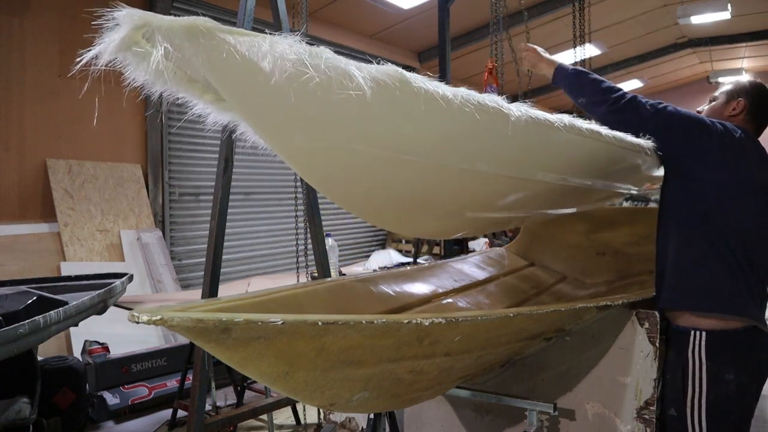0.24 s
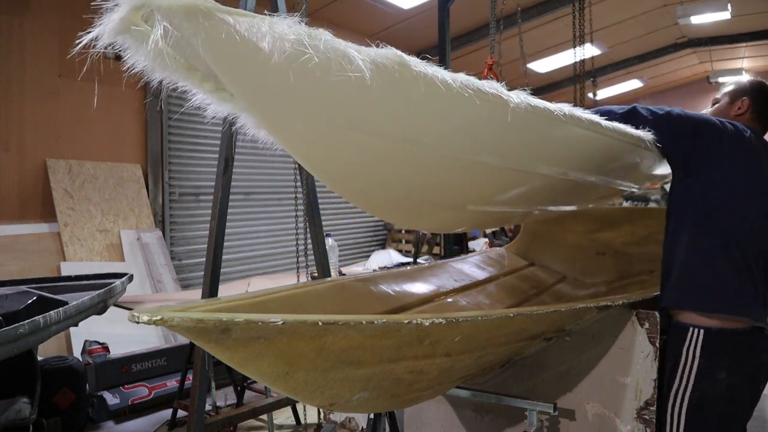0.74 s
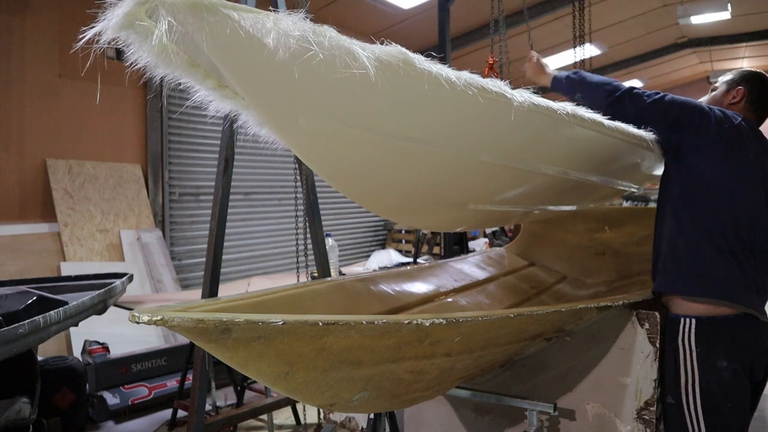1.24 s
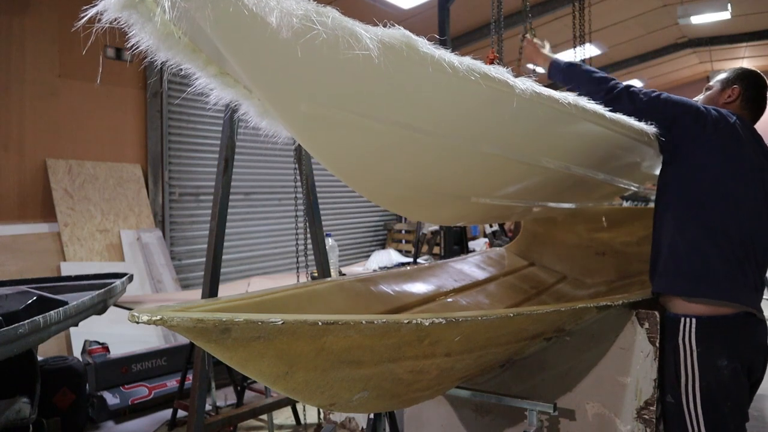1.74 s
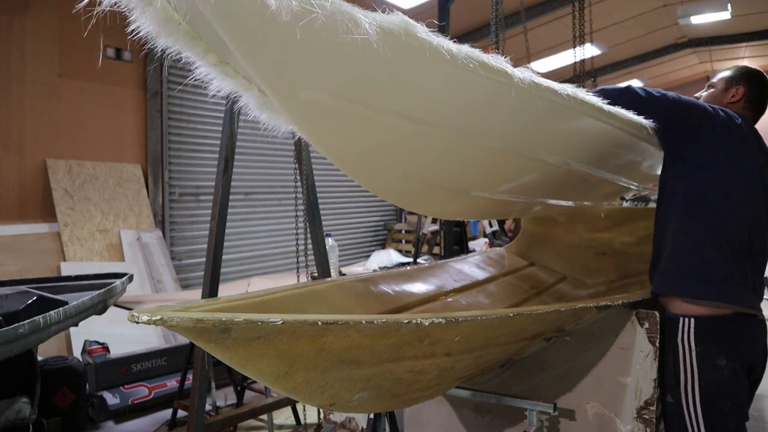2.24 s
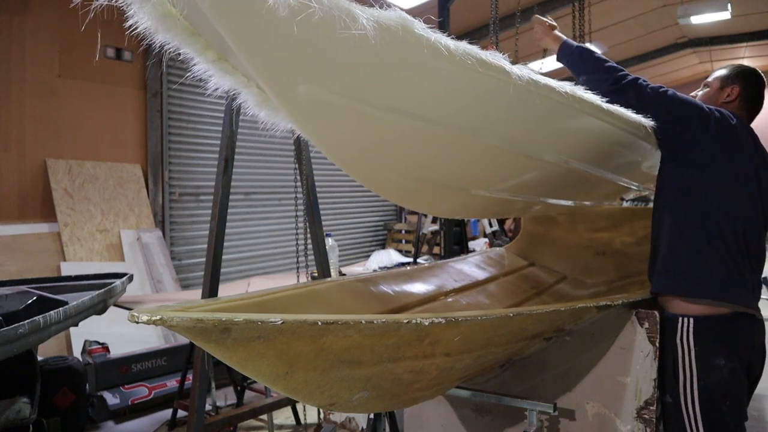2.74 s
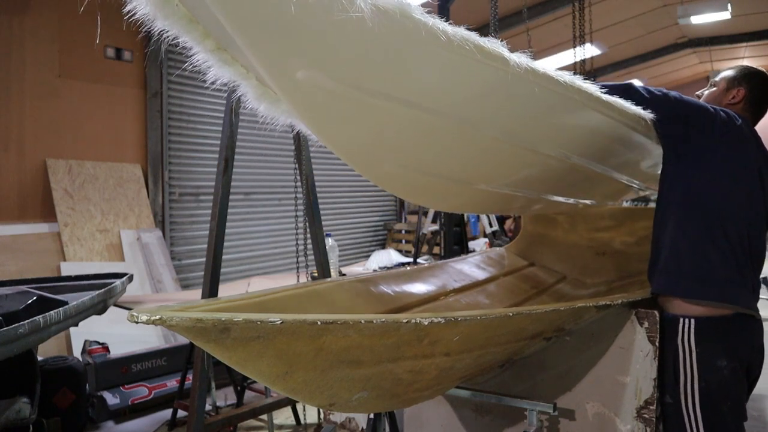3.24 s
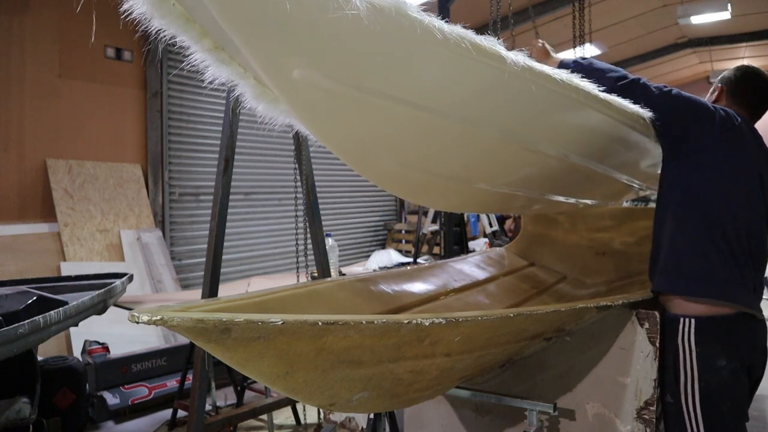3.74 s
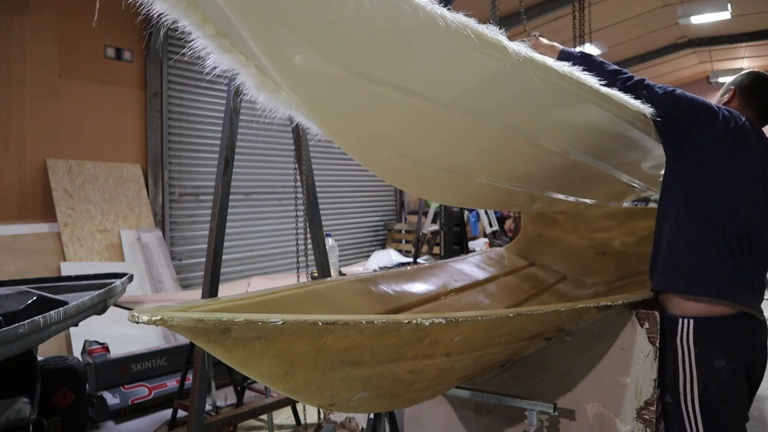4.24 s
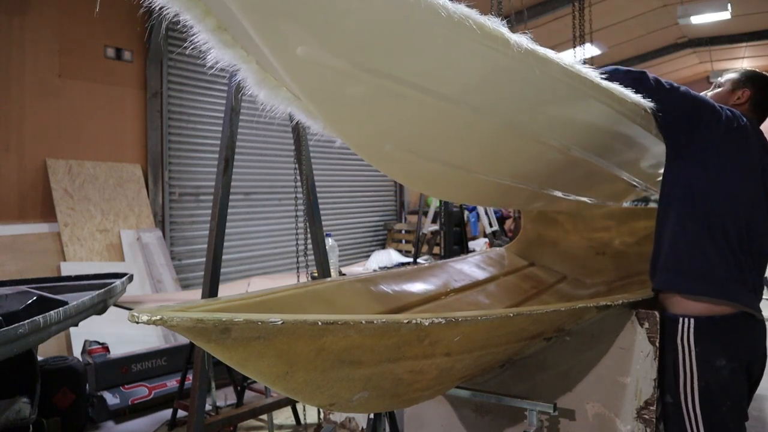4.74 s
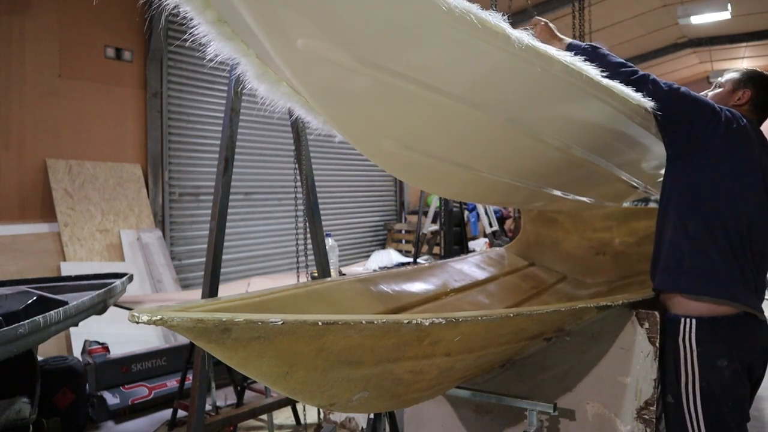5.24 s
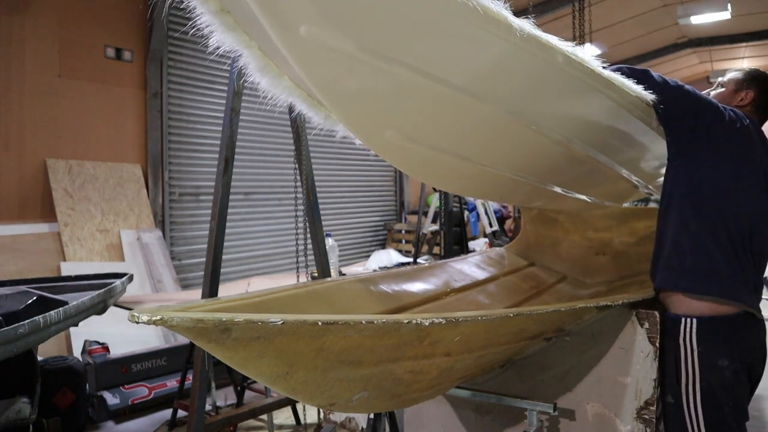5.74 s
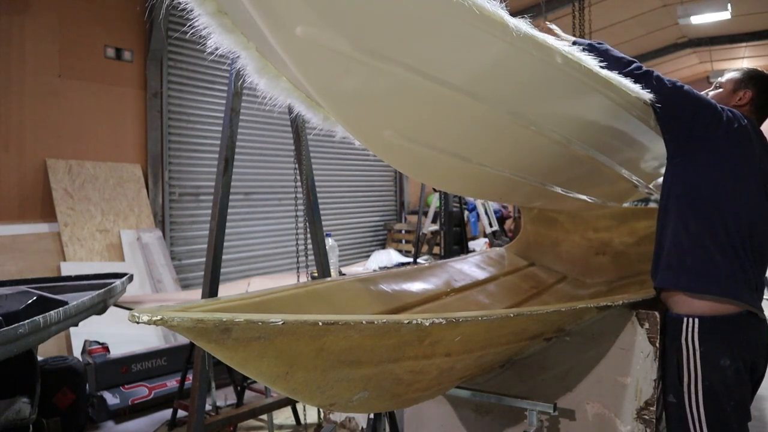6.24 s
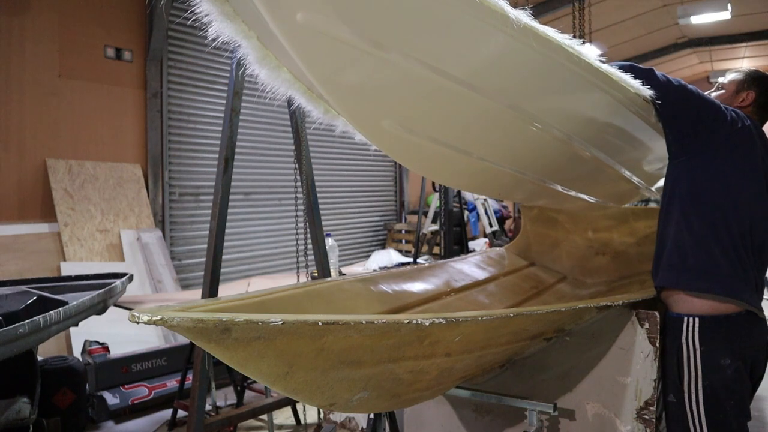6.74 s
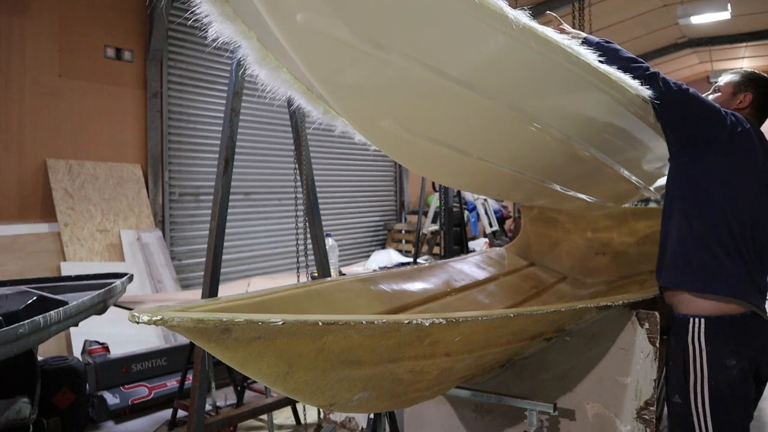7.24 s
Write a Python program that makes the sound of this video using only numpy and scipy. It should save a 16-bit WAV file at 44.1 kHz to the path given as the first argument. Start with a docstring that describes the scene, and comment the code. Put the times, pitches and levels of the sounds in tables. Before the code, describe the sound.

A chain is already rattling at the start, then comes eight more short pulls. Light link clinks lead each one, followed by a coarse, rapid metallic rasp and bouncing knocks on a hollow hull that booms faintly underneath. Echoes fill the gaps, along with occasional brief scrapes of swinging chain. Near stereo microphones in a large hard hall, quiet steady air behind.

```python
"""A hand chain hoist lifts a boat moulding in a large workshop; the first pull is already under way.
In each later pull the steel links jingle first, as shaped noise ticks and decaying tones.
Then the taut chain rasps and knocks on a stiff panel, whose bending waves make each knock a tiny falling chirp.
Between some pulls the slack chain swings back and brushes the panel.
The hall rings on for about a second, the shell booms faintly, and soft noise is the still air throughout."""
import sys
import numpy as np
from scipy import signal
from scipy.fft import rfft, irfft, next_fast_len
from scipy.io import wavfile

SR = 44100
rng = np.random.default_rng(int(sys.argv[2]) if len(sys.argv) > 2 else 0)


def unload_wav(signal):
    """Save mono or channel-first audio to the path in sys.argv[1] as 16-bit WAV at rate SR, clipped to [-1, 1]."""
    wavfile.write(
        sys.argv[1],
        SR,
        np.round(np.clip(np.atleast_2d(signal).T, -1, 1) * 32767).astype(np.int16),
    )


N = 330309

# samples in one knock or clink, and samples that come before its strike
SIZE, LEAD = 2048, 256


def amp(db):
    """Turns decibels into a plain factor."""
    return 10 ** (np.asarray(db) / 20)


def unit(x):
    """Scales a short sound to an average energy of 1 per channel."""
    return x / np.sqrt(np.sum(x ** 2) / len(x) + 1e-20)


def evened(x):
    """Scales to rms 1."""
    return x / np.sqrt(np.mean(x ** 2) + 1e-20)


def read(points, hz):
    """Reads a table between its points, on a log-frequency axis."""
    f, value = np.transpose(points)
    return np.interp(np.log(hz + 1), np.log(f + 1), value)


def colour(x, points):
    """Filters a sound by the frequency curve of a table in dB."""
    size = next_fast_len(x.shape[-1])
    gain = amp(read(points, np.fft.rfftfreq(size, 1 / SR)))
    return irfft(rfft(x, size) * gain, size)[..., :x.shape[-1]]


def add(mix, s, sound):
    """Mixes in a short stereo sound whose strike lies LEAD samples after its start."""
    at = round(s * SR) - LEAD
    sound = sound[:, max(-at, 0):]  # cut what falls before the beginning
    part = mix[:, max(at, 0):][:, :sound.shape[1]]
    part += sound[:, :part.shape[1]]


def shower(sounds, strength, per_s, spread_db):
    """Links pass in quick, uneven succession, each making one of the sounds."""
    count = 5000
    gap, size, pick = rng.random((count, 3)).T
    times = np.cumsum(.15 + 1.7 * gap) / per_s
    gains = evened(amp(spread_db * (2 * size - 1))) * np.sqrt(SR / per_s)
    gains = gains * np.interp(times, np.arange(N) / SR, strength * np.ones(N))
    picks = (pick * len(sounds)).astype(int)
    out = np.zeros((2, N))
    for s, gain, k in zip(times[times < N / SR], gains, picks):
        add(out, s, gain * sounds[k])
    return out


# Pulls on the hand chain. Each row: grabbed, taut and let go in seconds,
# then rasp and jingle strength in dB before the mix levels.
PULLS = [(-.3, -.2, 0.073, -22.5, -24), (0.523, .745, 0.81, -24.5, -27), (1.282, 1.386, 1.585, -26, -24.5),
         (2.086, 2.175, 2.432, -24, -24), (3.049, 3.167, 3.35, -22.5, -26), (3.817, 3.951, 4.085, -24, -25),
         (4.649, 4.797, 4.945, -24.5, -26.5), (5.498, 5.603, 5.79, -24, -28),
         (6.427, 6.516, 6.7, -26.5, -30.5)]
# The slack chain swings back and brushes the panel. Each row: middle in seconds, half length in seconds,
# peak rasp strength in dB before the mix level.
SWINGS = [(0.142, 0.037, -27), (1.015, 0.017, -26.5), (4.301, 0.034, -26.5), (5.036, 0.034, -27.5),
          (5.928, 0.034, -23.5), (5.991, 0.033, -19.5), (7.47, 0.074, -31)]
# the jingle starts softly and swells once the chain is grabbed
GRAB_DB, GRAB_S = -7.5, 0.044
# the rasp sets in a little after the grab, this far down, grows as the slack is taken up, is full when taut
RASP_LAG_S, SLACK_DB, TAKEN_UP_DB = 0.035, -13, -3
# how fast rasp and jingle die once the chain is let go
RASP_STOP_DB_PER_S, JINGLE_STOP_DB_PER_S = 330.0, 315
# a swing's level at its ends, and its jingle, against its peak rasp
SWING_END_DB, SWING_JINGLE_DB = -11.5, -17.5


def motion():
    """Moving chain: strength of rasp and jingle; pulls swell, hold and stop, swings are short arches."""
    t = np.arange(N) / SR
    rasping, jingling = np.zeros((2, N))
    for grabbed, taut, let_go, rasp_db, jingle_db in PULLS:
        free_s = np.clip(t - let_go, 0, 1)
        rasp_start = grabbed + RASP_LAG_S
        take_up_db = np.interp(t, [rasp_start, taut], [SLACK_DB, TAKEN_UP_DB], right=0)
        swell_db = np.interp(t - grabbed, [0, GRAB_S], [GRAB_DB, 0])
        rasping += (t >= rasp_start) * amp(rasp_db + take_up_db - RASP_STOP_DB_PER_S * free_s)
        jingling += (t >= grabbed) * amp(jingle_db + swell_db - JINGLE_STOP_DB_PER_S * free_s)
    swinging = np.zeros(N)
    for middle, half, db in SWINGS:
        arch = np.minimum(((t - middle) / half) ** 2, 20)
        swinging += amp(db + SWING_END_DB * arch)
    return rasping + swinging, jingling + amp(SWING_JINGLE_DB) * swinging


# The panel's answer to a knock. Each row: frequency in Hz, relative level in dB.
PANEL = [(30, -30), (75, -25.5), (115, -3.5), (170, -9), (280, -5), (500, -2.5), (800, -1), (1300, -2),
         (2100, 0), (3800, 1.5), (6000, -1), (9000, -9), (12000, -15), (15000, -42)]


def knock(centre_hz, sweep_s=0.1394, octaves=0.68, low_skirt=0.36, high_skirt=0.18,
          scatter=0.66, scatter_s=0.0072, ear_spread=0.24):
    """A bending wave: its speed grows as the root of frequency, so the treble arrives first."""
    hz, t = np.fft.rfftfreq(SIZE, 1 / SR) + 1, np.arange(SIZE) / SR
    # each channel has its own strongest frequency, spread in octaves
    centres = centre_hz * 2 ** (ear_spread * rng.standard_normal((2, 1)))
    skirt = np.where(hz < centres, low_skirt, high_skirt)
    hump = np.exp(-.5 * (np.log2(hz / centres) / octaves) ** 2)
    gain = amp(read(PANEL, hz)) * (skirt + (1 - skirt) * hump)
    path = sweep_s * rng.uniform(0.745, 1.2017)  # delay of a 1 Hz wave; each knock lands at another distance
    # phase in turns: the centre frequency arrives at the strike
    turns = path * (2 * np.sqrt(hz) - hz / np.sqrt(centre_hz)) + hz * LEAD / SR + rng.random()
    edges = rfft(unit(rng.standard_normal((2, SIZE)) * np.exp(-t / scatter_s)))  # echoes from the panel's rim
    edges = np.where(hz < 900, edges[0], edges)  # alike in both channels below 900 Hz
    return unit(irfft(gain * np.exp(-2j * np.pi * turns) * (1 + scatter * edges)))


# Hard knocks of the chain on the panel. Each row: time in seconds, level in dB before knock_db,
# strongest frequency in Hz before its random spread, loss per rebound in dB (negative grows).
KNOCKS = [(.004, -8.5, 2240, 3), (.061, -19, 2850, 2), (0.1495, -15.5, 2650, 12), (0.5583, -19, 1980, 0.5),
          (.612, -17, 2150, 2.5), (.7298, -10.5, 2000, 12), (0.7797, -13.5, 2380, 3.5),
          (0.8096, -9.5, 2120, 4), (0.9857, -12.5, 2290, 12), (1.009, -10, 2160, 5),
          (1.2258, -33, 2230, 10), (1.2987, -18, 1780, 5), (1.3752, -11, 2580, 15), (1.3876, -5, 2370, 3.5),
          (1.4383, -12.5, 2170, -1), (1.4666, -5, 1945, 6.5), (1.4901, -7, 2450, 5.5),
          (1.5036, -7, 2400, 8), (1.5748, -13, 2590, 2.5), (2.0114, -29.5, 2170, 7), (2.182, -9, 2380, 5),
          (2.254, -11, 2290, 0.5), (2.2764, -5.5, 2430, 2), (2.3901, -9, 2430, 5), (2.4089, -5.5, 2490, 12),
          (3.15, -14, 3160, 4), (3.1618, -7, 2370, 9), (3.1754, -6.5, 2320, 3.5), (3.2435, -14, 3000, 4.5),
          (3.2946, -14.5, 1860, 4), (3.3249, -10, 2500, 2.5), (3.9569, -6, 2480, 3.5),
          (3.9854, -6, 2534, 2.5), (4.094, -8, 2540, 4.5), (4.2393, -20, 4000, 11),
          (4.2681, -15.5, 3920, 16), (4.2849, -16.5, 3670, 12), (4.7045, -16, 2720, 1),
          (4.7854, -10, 2490, 2), (4.8216, -6, 2145, 2), (4.8798, -8, 2520, 2.5), (4.946, -13.5, 2510, 8),
          (5.1079, -19, 3303, 7), (5.6206, -6.5, 2220, 6), (5.6596, -7.5, 2340, 3), (5.7, -9.5, 2510, 6),
          (5.759, -6, 3110, 4), (5.9144, -13.5, 2050, 5), (5.9936, -13.5, 2000, 4), (6.5006, -5, 2180, 6),
          (6.5222, -5, 3700, 14), (6.5774, -9, 3220, 2.5), (6.6673, -10.5, 3100, 1),
          (6.7074, -6.5, 3430, 2.5), (7.262, -43, 2400, 2), (7.378, -18.5, 2200, 4), (7.3947, -16, 2380, 6),
          (7.4377, -10.5, 2800, 2), (7.4598, -9, 3240, 7), (7.4846, -10, 2940, 5)]
# uneven rebounds: mean gap in seconds, and its spread as a share of the gap
REBOUND_S, REBOUND_SPREAD = .0105, .4


def clatter(knock_db=16.5, count=5):
    """The chain bounces: each hard knock is followed by four rebounds, nearly always weaker each time."""
    out = np.zeros((2, N))
    for s, db, hz, loss_db in KNOCKS:
        for k, chance in enumerate(rng.uniform(-1, 1, count)):
            add(out, s, amp(db + knock_db - k * loss_db) * knock(hz))
            s = s + REBOUND_S * (1 + REBOUND_SPREAD * chance)
    return out


def rasp(strength, centre_hz=2500, centre_spread=0.549, run_db=-.7, dangle_db=-57):
    """The chain runs over the panel in many small knocks, over sparser faint taps as it dangles."""
    small = [knock(centre_hz * 2 ** (centre_spread * z)) for z in np.linspace(-2, 2, num=64)]
    running = amp(run_db) * shower(small, strength, per_s=260, spread_db=6)
    return running + shower(small, amp(dangle_db), per_s=32, spread_db=5)


# Ring of a steel link. Each row: frequency in Hz before detuning, width in Hz (wider dies faster),
# level in dB before its random unevenness.
LINK = [(3560, 90, 6), (3780, 65, 5), (4470, 55, 5), (5500, 70, -3), (5950, 70, -2), (7250, 90, -1),
        (8000, 90, -4), (8500, 90, -5), (9200, 110, -2), (10480, 140, -1), (11050, 140, -2),
        (11330, 130, 0), (12400, 160, -11)]
# The tick of steel on steel. Each row: frequency in Hz, relative level in dB.
TICK = [(300, -17), (1000, -14), (1500, -25), (2800, -8.5), (3700, -5.5), (5200, -0.5), (8000, 1),
        (11400, 0), (12200, -7), (14000, -12), (15500, -62)]
# how much the colour of a tick varies from band to band
GLINT_DB = 4.5


def clink(tick_s=0.0055, ring_db=-1.0, detune=.009, uneven_db=6):
    """One link is struck: a bright noise tick and the link's modes, each excited by chance."""
    t = np.arange(SIZE - LEAD) / SR
    hz, width, db = np.transpose(LINK)[:, :, None]
    pitch = hz * (1 + detune * rng.standard_normal(hz.shape))  # no two links are quite alike
    strength = amp(db + uneven_db * rng.standard_normal(hz.shape)) * np.sqrt(width)
    phase = rng.random(hz.shape) + 0.43 * rng.random((2, len(hz), 1))
    modes = strength * np.exp(-np.pi * width * t) * np.sin(2 * np.pi * (pitch * t + phase))
    tick = rng.standard_normal((2, len(t))) * np.exp(-t / tick_s)
    tick = tick + .5 * tick[::-1]  # both microphones hear much the same tick
    silence_first = ((0, 0), (LEAD, 0))
    ring, tick = np.pad(modes.sum(axis=1), silence_first), np.pad(tick, silence_first)
    bands = np.linspace(0, SR / 2, num=30)
    # each point of contact has its own colour
    glint = np.transpose([bands, GLINT_DB * rng.standard_normal(len(bands))])
    tick = colour(colour(tick, glint), TICK)
    return unit(unit(tick) + amp(ring_db) * unit(ring))


# Single links striking each other. Each row: time in seconds before late_s, level in dB before clink_db.
CLINKS = [(.06, -13), (.472, -35), (0.508, -21.5), (0.5284, -14.5), (.609, -12), (1.243, -27),
          (1.2697, -21), (1.286, -14), (1.8372, -26), (1.8861, -29), (2.08, -17), (2.102, -23), (2.222, -9),
          (2.8145, -30), (2.919, -37), (3.037, -16), (3.058, -12.5), (3.097, -11), (3.5847, -27),
          (3.75, -23.5), (3.812, -13.5), (4.236, -20), (4.6058, -22.5), (4.6529, -13.5), (4.672, -13),
          (4.816, -7.5), (5.2753, -28), (5.4224, -24), (5.431, -17), (5.474, -16), (5.99, -11),
          (6.4082, -20.5), (6.4216, -12.5), (6.47, -17), (6.497, -5)]


def jingle(strength, run_db=-1.5, clink_db=11, late_s=.0012, dangle_db=-69):
    """Links shake against each other as the chain moves, tick faintly as it dangles, and clink singly."""
    small = [clink() for _ in range(48)]
    out = amp(run_db) * shower(small, strength, per_s=260, spread_db=8)
    out += shower(small, amp(dangle_db), per_s=25, spread_db=5)
    for s, db in CLINKS:
        add(out, s + late_s, amp(db + clink_db) * clink())
    return out


# The right microphone is nearer the panel. Each row: frequency in Hz,
# left minus right in dB at a full share.
SIDES = [(100, 2), (300, 0.3), (600, -2), (1200, 0), (2200, -11), (4000, -0.5), (8000, -2.5), (13000, .5)]


def placed(x, share):
    """Leans a sound to one side, mostly the right, by a share of the full difference at each frequency."""
    hz, db = np.transpose(SIDES)
    left = colour(x[0], np.transpose([hz, share * db / 2]))
    right = colour(x[1], np.transpose([hz, -share * db / 2]))
    return np.array([left, right])


# Low modes of the hanging hull. Each row: frequency in Hz, level in dB before boom_db,
# seconds to fall by 60 dB.
HULL = [(107.1, -55.5, 1), (129.2, -55, 0.76), (209.7, -50.5, 0.77), (304.5, -51.5, 0.56)]


def hull(knocks, moving, gears_db=.5, boom_db=-6):
    """Knocks, and the hoist's gears grinding as noise while the chain moves, make the big shell boom."""
    gears = amp(gears_db) * moving * rng.standard_normal(N)
    t = np.arange(SR) / SR
    ring = sum(amp(db - 60 * t / t60) * np.sin(2 * np.pi * hz * t) for hz, db, t60 in HULL)
    return amp(boom_db) * signal.fftconvolve(knocks.mean(0) + gears, ring)[:N]


# Likeness of diffuse sound in the two microphones. Each row: frequency in Hz,
# correlation (1 alike, 0 unrelated, negative opposed).
LIKENESS = [(100, 1), (250, 0.98), (500, 0.88), (1000, 0.59), (2000, -0.016), (4000, -0.45), (8000, -0.6),
            (13000, -0.63)]


def diffuse(size):
    """Noise arriving from all sides: alike in both microphones in the bass, partly opposed in the treble."""
    a, b = rfft(rng.standard_normal((2, size)))
    same = np.clip(read(LIKENESS, np.fft.rfftfreq(size, 1 / SR)), -1, 1)
    mid, side = np.sqrt(1 + same) * a, np.sqrt(1 - same) * b
    return evened(irfft([mid + side, mid - side], size))


# Fading of the hall. Each row: frequency in Hz, seconds for the late echoes to fall by 60 dB.
HALL = [(100, 0.99), (400, 1.35), (1000, 1.08), (2500, 1.024), (5000, 0.93), (8000, 0.8), (13000, 0.49)]


def echoes(build_s=0.0053, early=1.0, early_s=0.017):
    """Dense echoes swell within milliseconds, strongest from the near roof, and die fastest in the treble."""
    hz, t, z = signal.stft(diffuse(size=3 * SR // 2), SR, nperseg=256)
    fade = amp(-60 * t / read(HALL, hz)[:, None])
    tail = signal.istft(z * fade, SR, nperseg=256)[1]
    t = np.arange(tail.shape[1]) / SR
    return unit(tail * (1 - np.exp(-(t / build_s) ** 2)) * (1 + early * np.exp(-t / early_s)))


def hall(x, count=4):
    """Several echo patterns of the one hall are fed in turn, so its ring stays even."""
    turn = np.arange(N) / SR * 17  # the feeds fade in and out in turn, 17 rounds a second
    out = np.zeros((2, N))
    for k in range(count):
        share = np.maximum(np.cos(2 * np.pi * (turn - k / count)), 0)
        out += signal.fftconvolve((x * share)[None], echoes(), axes=1)[:, :N]
    return out


# Still air of the workshop. Each row: frequency in Hz, relative level in dB.
AIR = [(20, -29), (45, 1), (110, -4.5), (330, 0), (700, -1), (2000, 5.5), (5000, -14), (10000, -36),
       (15000, -22)]


def still_air(level_db=-50):
    """Steady, quiet noise from all sides, filtered to the colour of the room's air."""
    noise = diffuse(size=next_fast_len(N))[:, :N]
    return amp(level_db) * evened(colour(noise, AIR))


def scene():
    """Knocks and links, heard directly and through the hall, with the booming hull, over still air."""
    rasping, jingling = motion()
    knocks = rasp(rasping) + clatter()
    links = jingle(jingling)
    echo = hall(amp(0.5) * knocks[1] + amp(3.0) * links[1])  # the right channel feeds the hall
    direct = placed(knocks + links, share=1)
    return direct + placed(echo, share=0.11) + hull(knocks, jingling) + still_air()


def record(dry):
    """Clips at full scale, then removes what lies above about 15400 Hz."""
    low_pass = signal.firwin(301, 15400, window=("kaiser", 9), fs=SR)
    return signal.oaconvolve(np.clip(dry, -1, 1), low_pass[None], "same")


dry = scene()
out = record(dry)
unload_wav(out)
```